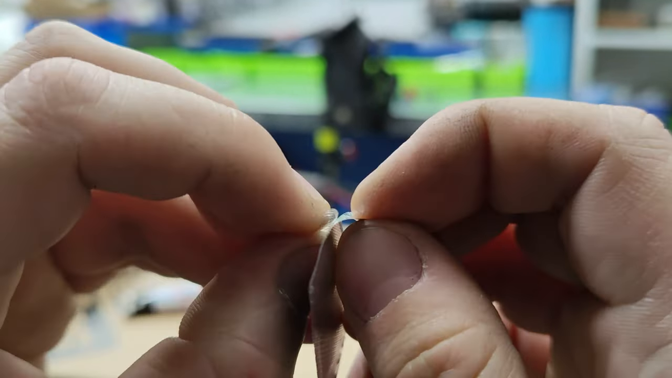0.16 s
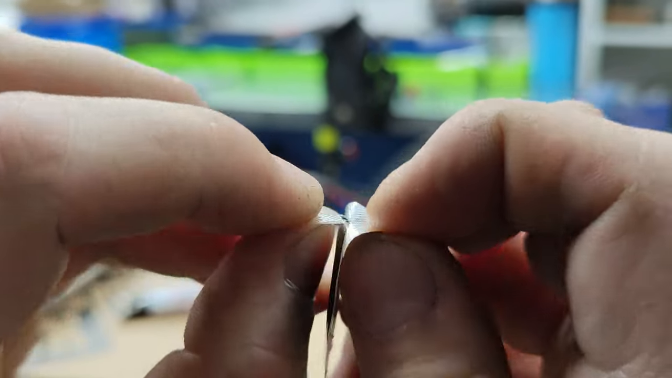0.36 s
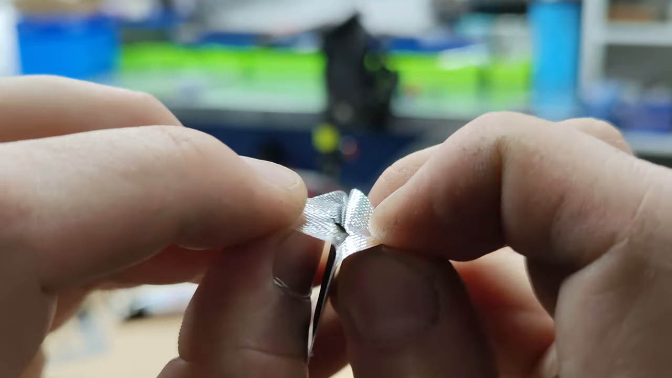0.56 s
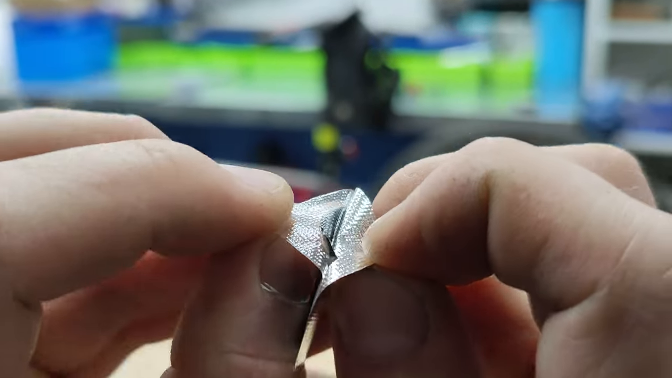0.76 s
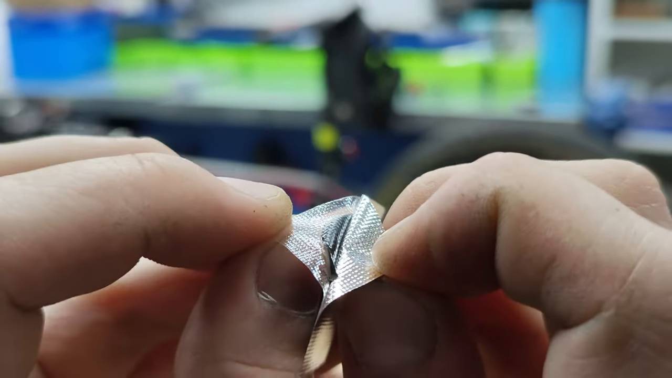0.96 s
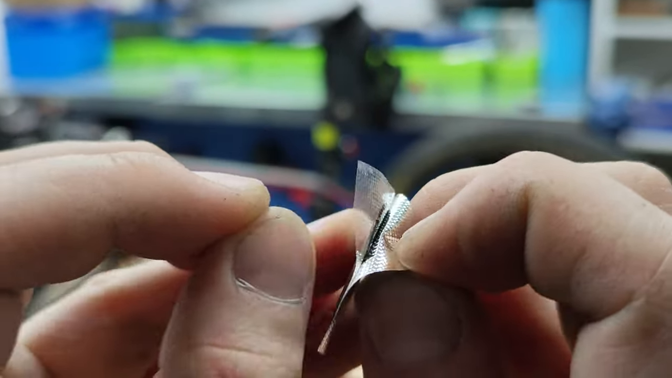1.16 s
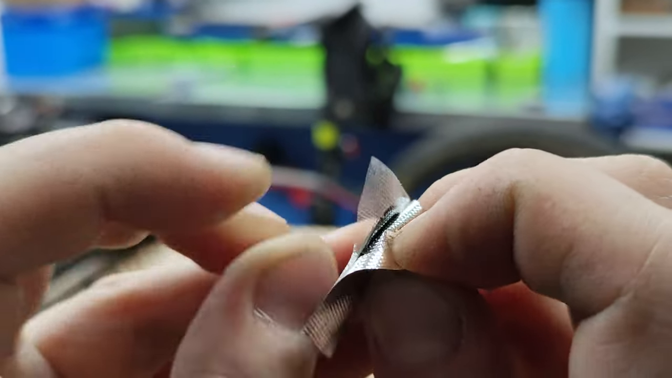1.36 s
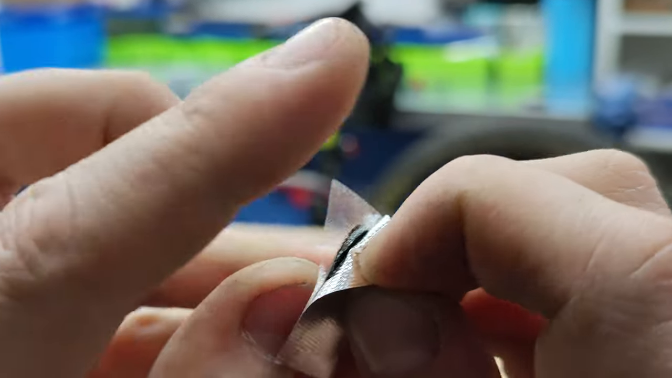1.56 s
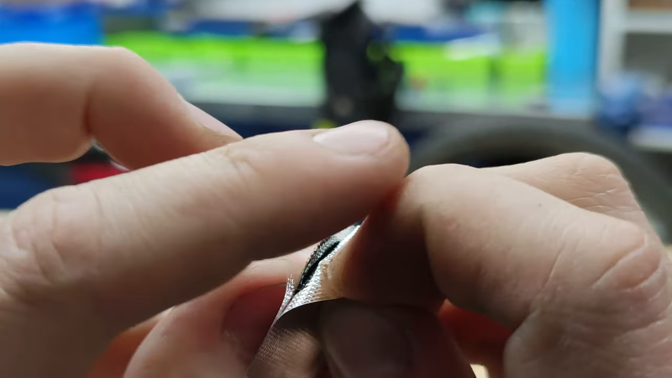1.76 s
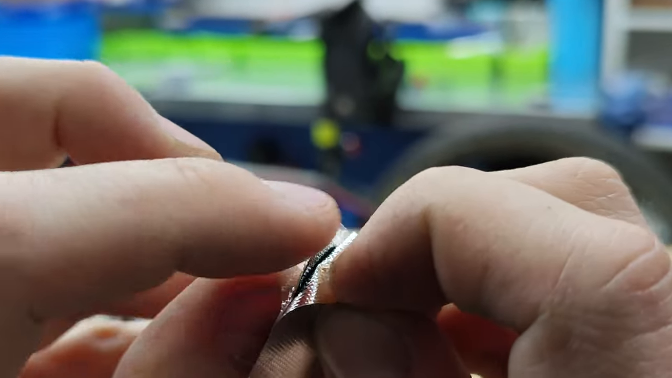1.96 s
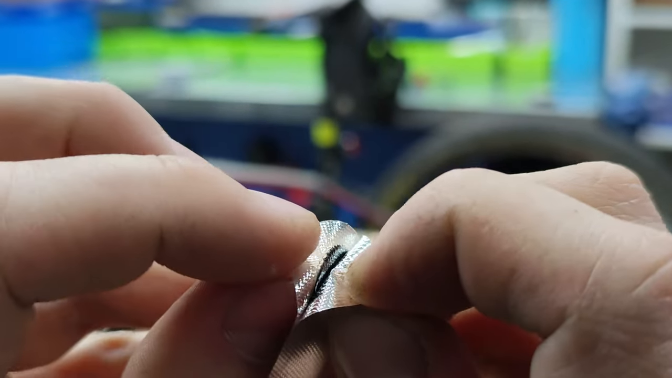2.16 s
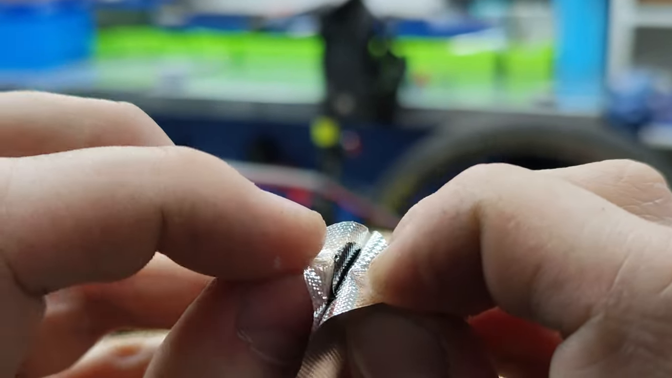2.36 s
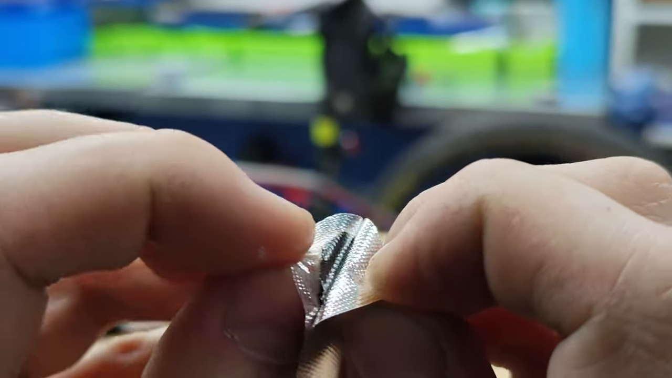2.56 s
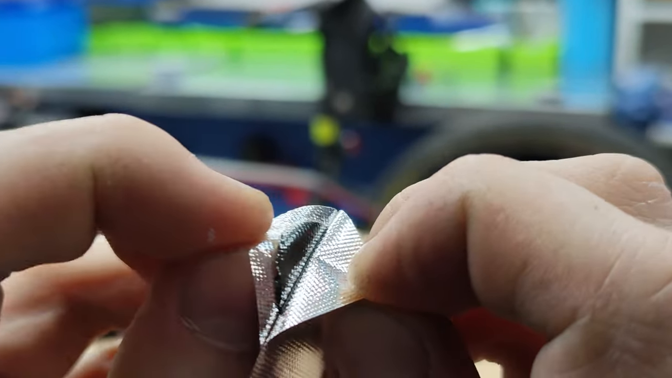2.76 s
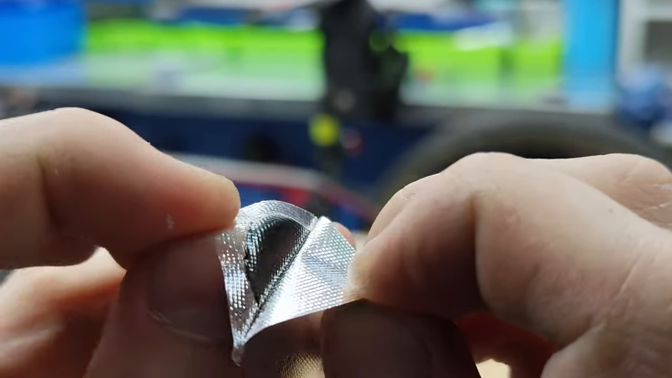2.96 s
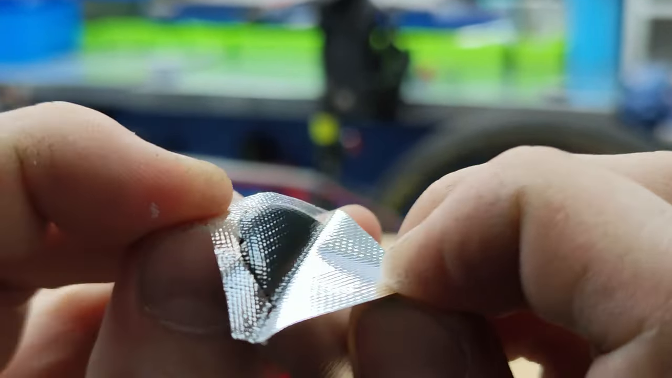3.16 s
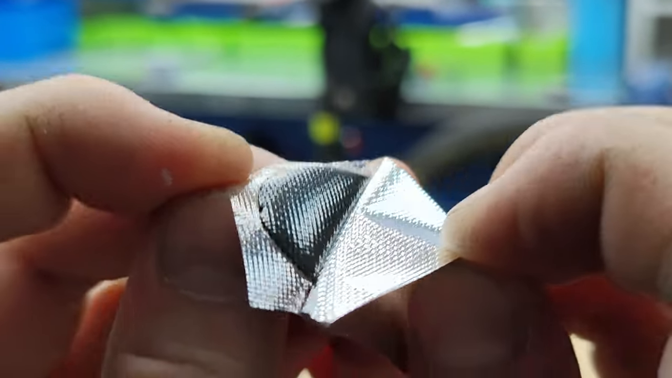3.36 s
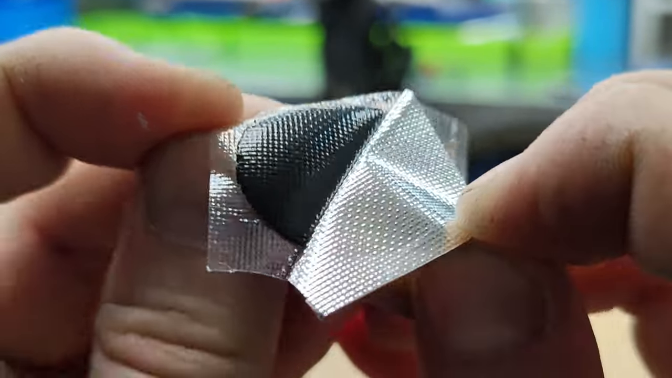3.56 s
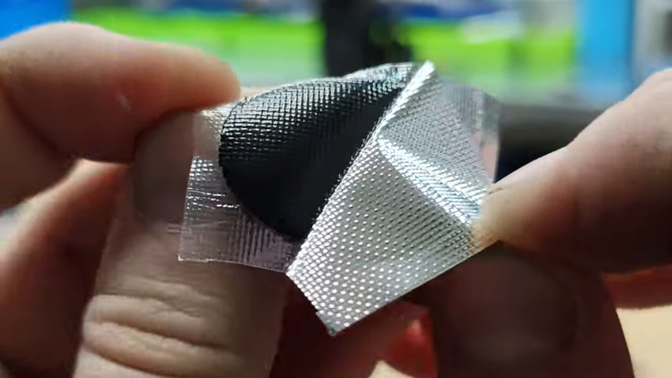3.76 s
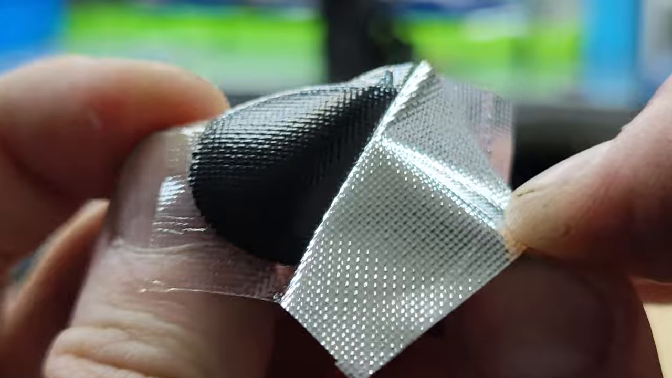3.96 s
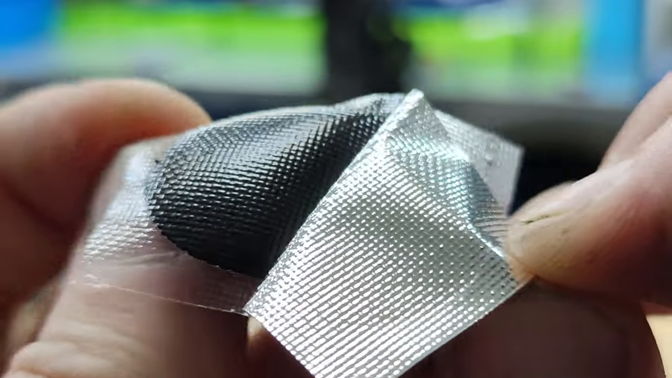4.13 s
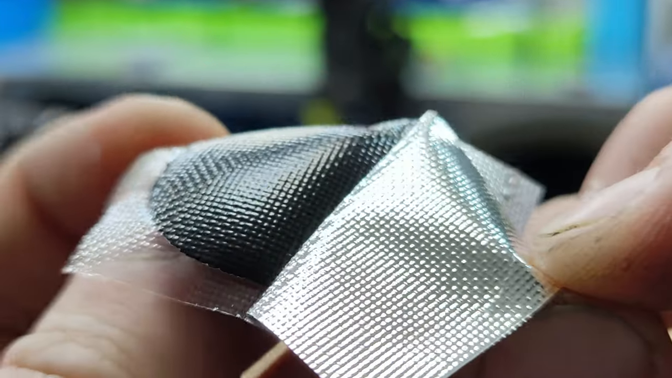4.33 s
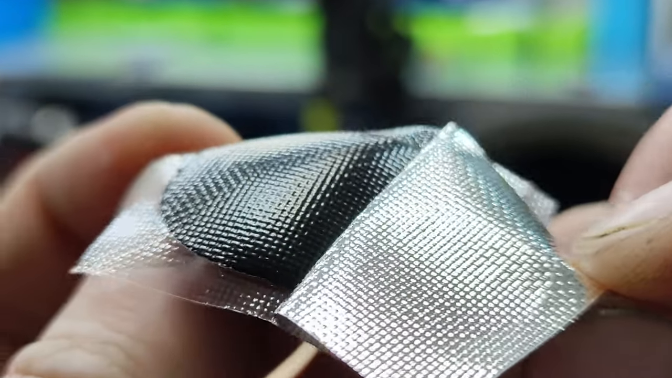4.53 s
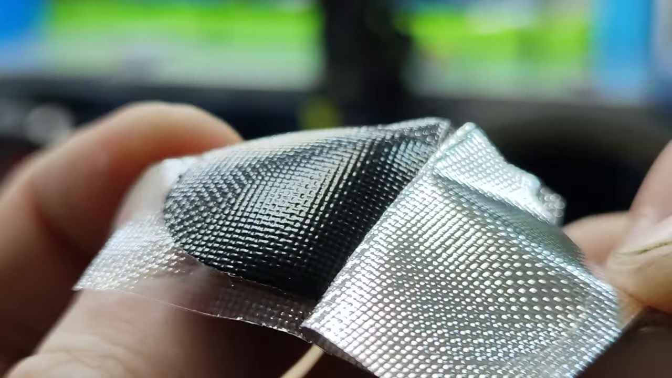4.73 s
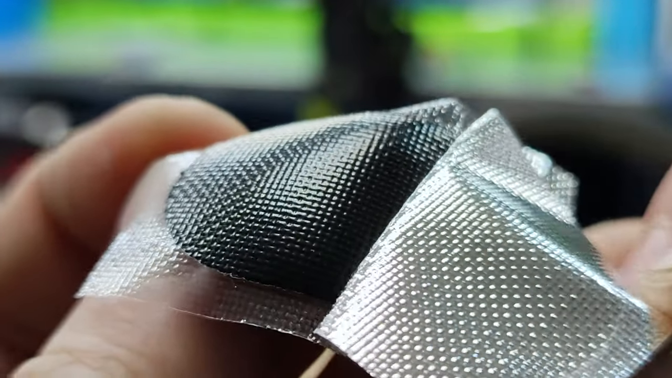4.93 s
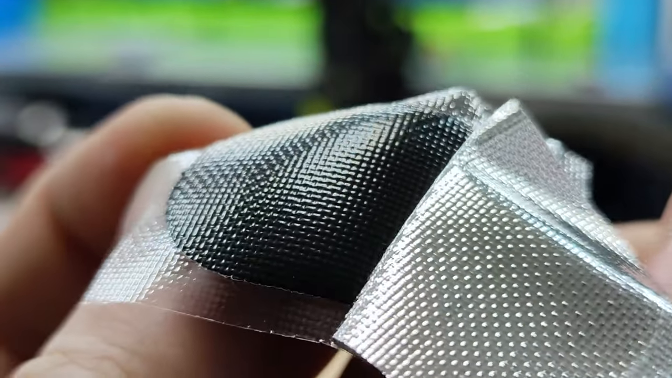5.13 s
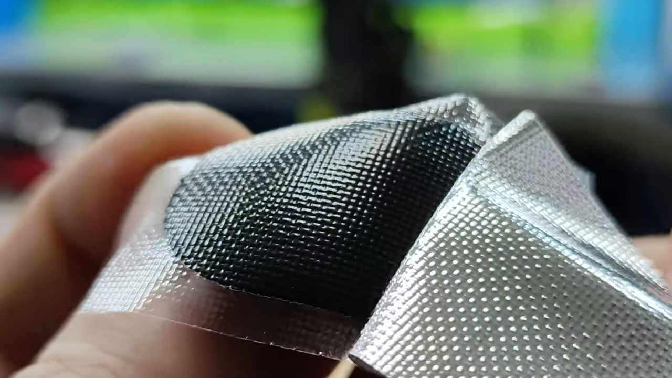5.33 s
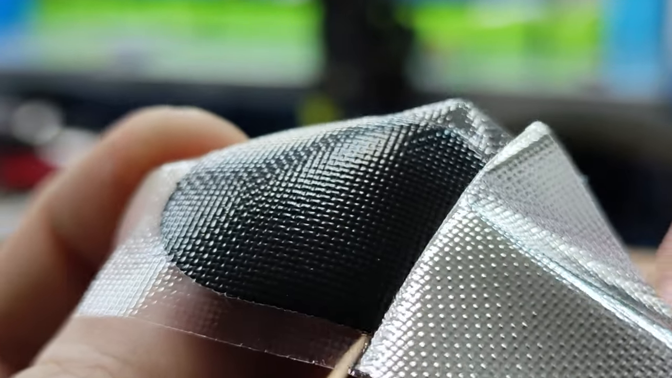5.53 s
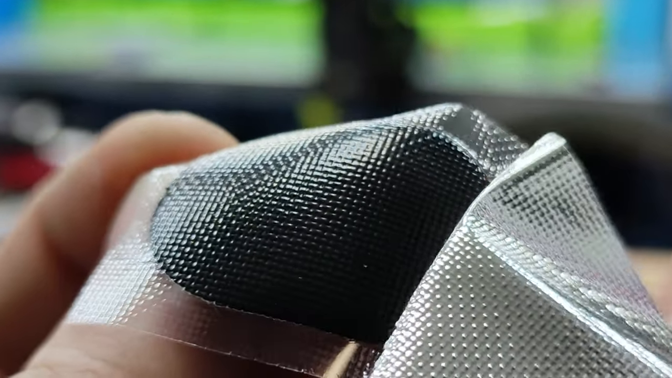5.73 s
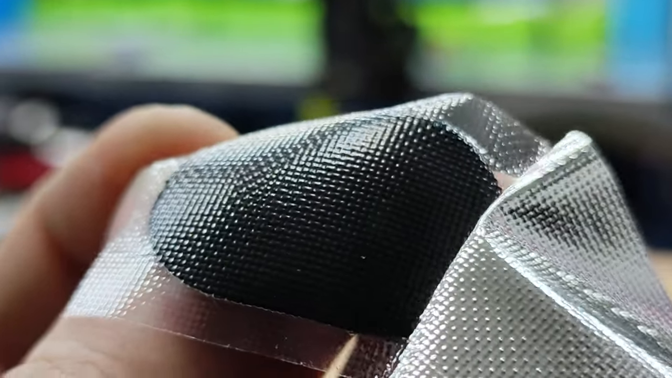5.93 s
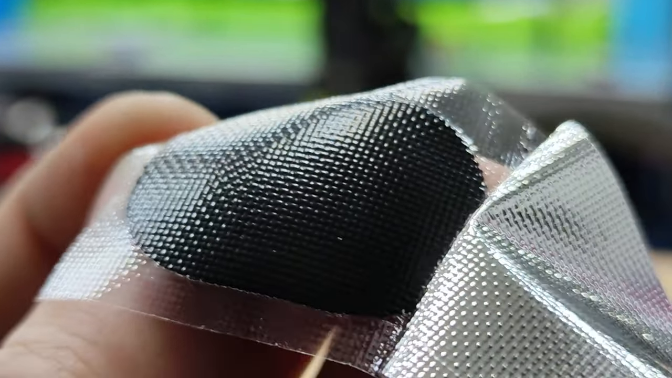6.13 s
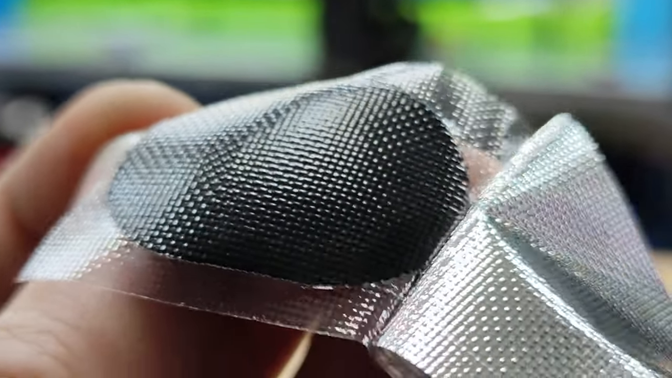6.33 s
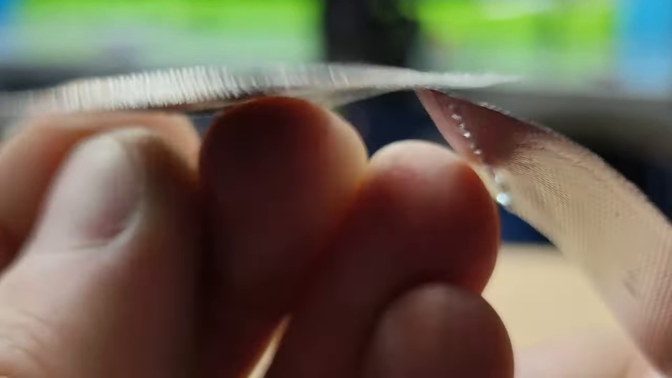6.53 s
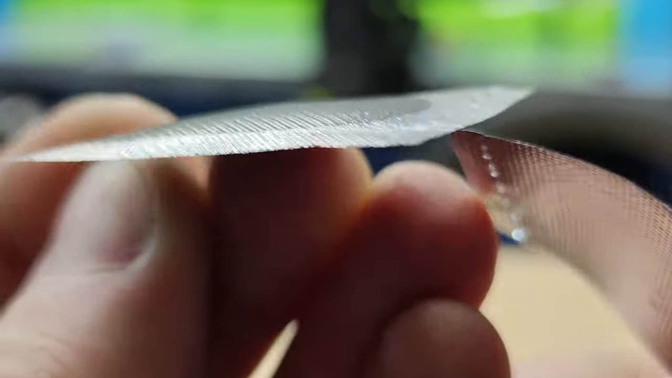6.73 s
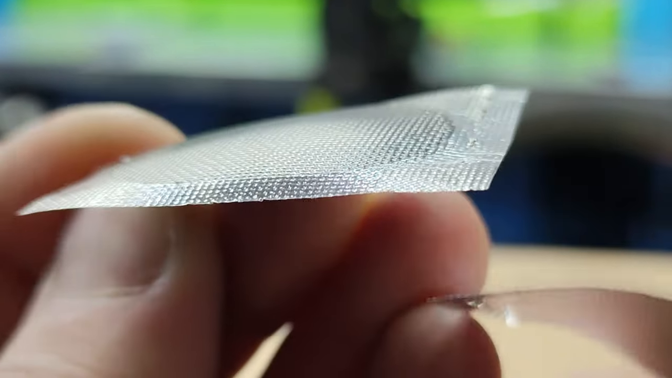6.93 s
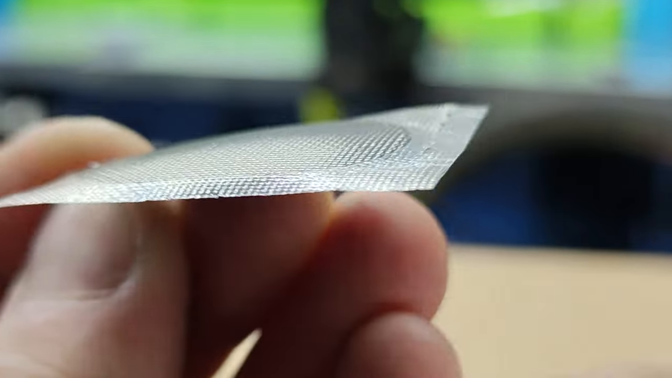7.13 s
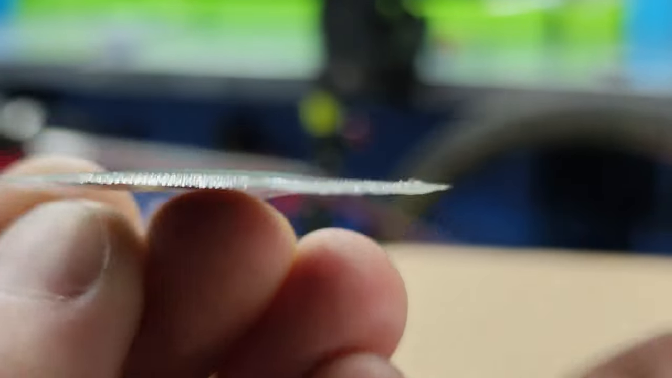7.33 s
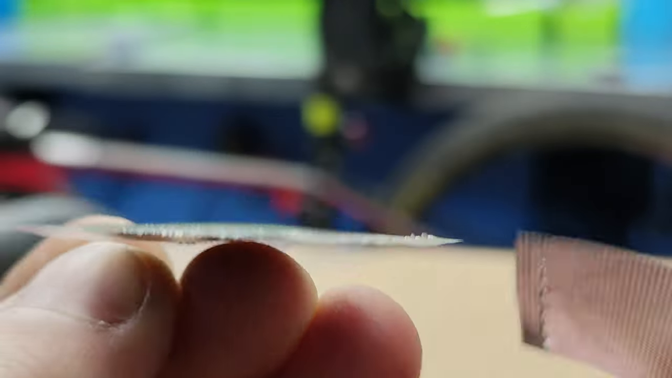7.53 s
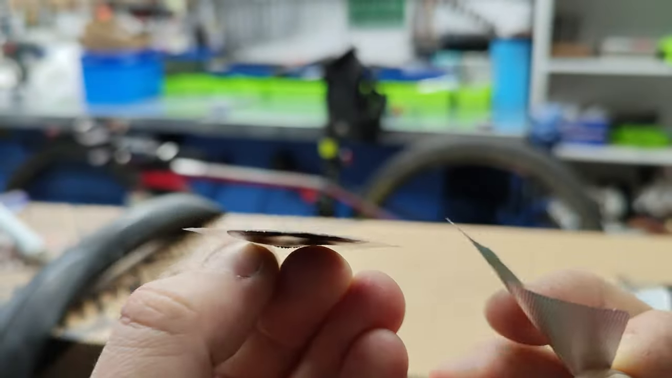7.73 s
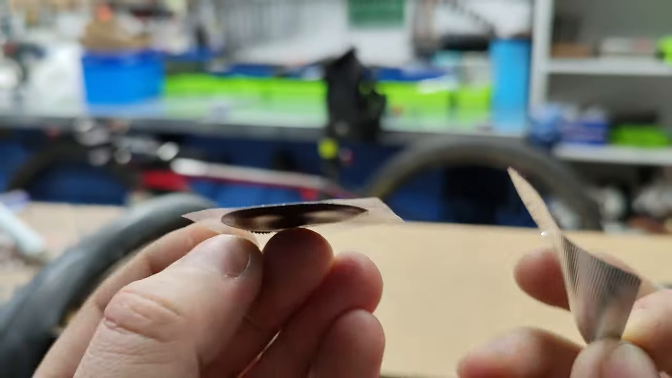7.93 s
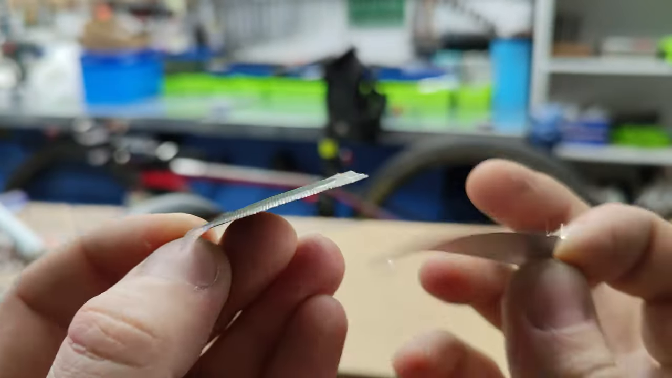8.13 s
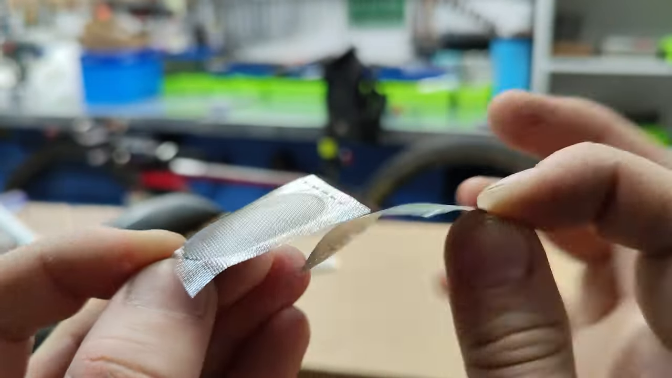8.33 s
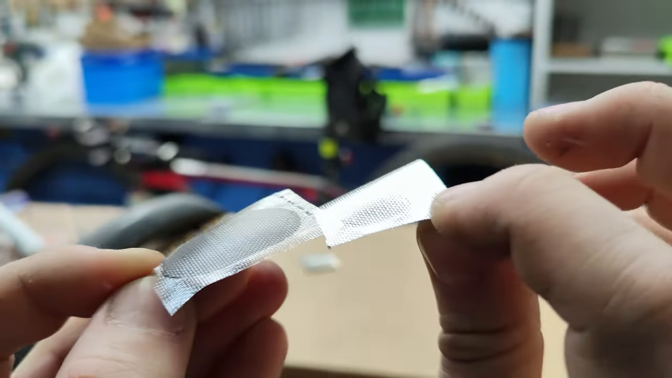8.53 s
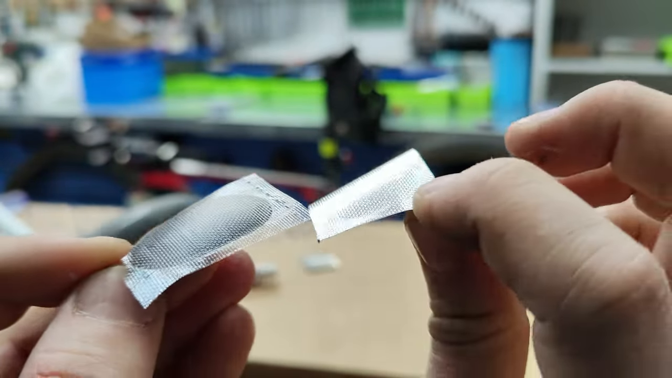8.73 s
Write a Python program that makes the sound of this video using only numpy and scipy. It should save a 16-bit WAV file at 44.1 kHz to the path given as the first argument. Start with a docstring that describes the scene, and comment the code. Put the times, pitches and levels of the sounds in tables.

```python
"""Foil peeled off a rubber patch

Fingers peel embossed foil backing off a rubber tyre patch, close to a phone in a quiet workshop.
Creases tick singly or in runs, the sheet buckles, glue crackles; the foil rips loose near 6.5 s.
Bursts of noise or slips ring broad sheet resonances; decaying sines make pitched tocks and a hand bump.
Crackle also shakes the lifted flap. A short noise tail is the small room, over rumble and hiss."""
import sys
import numpy as np
from scipy import signal
from scipy.fft import rfft, irfft
from scipy.io import wavfile

SR = 44100
rng = np.random.default_rng(int(sys.argv[2]) if len(sys.argv) > 2 else 0)


def wav_record(signal):
    """Record a signal, one row per channel, as 16-bit PCM in the file named by sys.argv[1]."""
    frames = np.transpose(np.atleast_2d(signal))
    bounded = np.clip(frames, -1, 1)
    # unit amplitude maps onto the largest positive 16-bit level
    quanta = np.round(bounded * 32767).astype(np.int16)
    wavfile.write(sys.argv[1], SR, quanta)


N = 392049
TIME = np.arange(N) / SR


def undb(db):
    """Decibels to gain."""
    return 10 ** (np.asarray(db) / 20)


def curve(rows, t):
    """Rows (time_s, value) joined by straight lines."""
    return np.interp(t, *np.transpose(rows))


def unit(x):
    """Scale to unit energy along the last axis."""
    return x / np.sqrt(np.sum(x ** 2, axis=-1, keepdims=True) + 1e-18)


def add(out, x, t):
    """Mix a stereo sound in at time t."""
    start = max(int(t * SR), 0)
    out[:, start:start + x.shape[1]] += x[:, :N - start]


def coloured(x, hz, db):
    """Shape a spectrum by (hz, db) points, joined over log frequency."""
    f = np.maximum(np.fft.rfftfreq(x.shape[-1], 1 / SR), 1)
    gain = undb(np.interp(np.log(f), np.log(hz), db))
    return irfft(rfft(x) * gain, x.shape[-1])


def ring(x, hz, width_hz, order=2):
    """A heavily damped resonance, as a bandpass."""
    low = np.hypot(hz, width_hz / 2) - width_hz / 2
    high = min(low + width_hz, SR / 2.1)
    return signal.sosfilt(signal.butter(order, [low, high], "band", fs=SR, output="sos"), x)


# right microphone port lies further off; the lag varies with the spot on the foil
PORT_LAG_S, LAG_SPREAD_S = 0.00021, 0.000035


def ports(near, stray, likeness):
    """The right port hears the same motion later, mixed with sound from other parts of the sheet."""
    share = np.clip(likeness, 0, 1)
    lag_s = PORT_LAG_S + LAG_SPREAD_S * rng.standard_normal(near.shape[:-1] + (1,))
    lag = np.rint(SR * lag_s).astype(int)
    size = near.shape[-1]
    late = np.take_along_axis(near, (np.arange(size) - lag) % size, axis=-1)
    return np.stack([near, share * late + np.sqrt(1 - share ** 2) * stray])


# where the hands hold the foil: time_s, left_minus_right_db
PLACE = [(0, 6.5), (3.4, 6.5), (6.2, 9), (6.46, 4), (7.1, 6), (7.55, 8), (8.15, 4)]


def placed(x, t):
    """Share the energy between left and right by where the hands are."""
    ratio = undb(curve(PLACE, t))
    sides = np.reshape([ratio, np.ones_like(ratio)], (2, -1))
    return x * sides / np.hypot(ratio, 1)


def play(times, sounds):
    """Lay out one stereo sound per event."""
    out = np.zeros((2, N))
    for t, sound in zip(times, sounds.swapaxes(0, 1)):
        add(out, placed(sound, t), t)
    return out


# sheet resonances, from whole-sheet flexing to the smallest dimples: centre_hz, width_hz
SHEET = [(290, 550), (1500, 1000), (4250, 2430), (8450, 2510), (12000, 1930)]


def sheet(push, modes_db, likeness):
    """A pair of unrelated pushes rings the uppermost resonances, one per column of modes_db."""
    sound = 0
    for (hz, width_hz), db in zip(SHEET[-modes_db.shape[1]:], modes_db.T):
        near, stray = unit(ring(push, hz, width_hz))
        sound = sound + undb(db)[:, None] * unit(ports(near, stray, likeness))
    return sound


def tilted(db, db_per_octave):
    """Energy in each resonance: the sharper the jolt, the more goes to the high ones."""
    hz = np.array(SHEET)[:, 0]
    return db[:, None] + db_per_octave[:, None] * np.log2(hz / np.median(hz))


def fractures(shape, per_s, spread_db):
    """Tiny slips at random moments: many weak, a few strong."""
    happens = rng.random(shape) < per_s / SR
    sizes = undb(spread_db * np.minimum(rng.exponential(size=shape), np.pi))
    return happens * sizes * rng.choice([-1, 1], shape)


# room rumble and, above 7 kHz, microphone hiss: freq_hz, relative_density_db (per Hz)
QUIET = [(25, -12), (45, -14.5), (80, -3.5), (130, -1.5), (330, -3.5), (600, -10.5), (1000, -13.5),
         (2000, -18.5), (4000, -23), (6800, -35.5), (10000, -25.5), (12500, -22), (14200, -23),
         (14700, -70)]
QUIET_RMS_DB = -60.5  # ahead of the phone's treble loss


def quiet():
    """Steady rumble and hiss, unrelated at the two ports."""
    noise = coloured(rng.standard_normal((2, N)), *np.transpose(QUIET))
    return undb(QUIET_RMS_DB) * np.sqrt(N) * unit(noise)


# room's answer: centre_hz, t60_s, relative_level_db
ROOM = [(300, 0.4, -15.5), (1510, 0.2, -12.5), (4080, 0.31, -15.5), (7800, .18, -17), (12830, 0.32, -19.5)]


def room(x, gap_s, size=16384):
    """Bench, shelves and walls scatter the sound; each band of the tail decays at its own rate."""
    t, f = TIME[:size], np.maximum(np.fft.rfftfreq(size, 1 / SR), 1)
    noise, tail = rfft(rng.standard_normal((2, size))), 0
    centres = np.log(np.array(ROOM)[:, 0])
    for (_, t60_s, db), band in zip(ROOM, np.eye(len(ROOM))):
        fade = unit(np.exp(-np.log(1000) * t / t60_s) * (t > gap_s))
        tail = tail + undb(db) * fade * irfft(noise * np.interp(np.log(f), centres, band))
    # the left port feeds both tails
    return signal.fftconvolve(x[:1], tail, axes=1)[:, :N]


BUMP_S, BUMP_HZ, BUMP_DB, BUMP_RISE_S, BUMP_FALL_S = 8.122, 124, -24, 0.006, 0.011


def bump(size=4096):
    """The hand knocks as it takes a new grip: a soft-edged, decaying low sine."""
    t = TIME[:size]
    fade = (1 - np.exp(-t / BUMP_RISE_S)) * np.exp(-t / BUMP_FALL_S)
    thud = undb(BUMP_DB) * unit(np.sin(2 * np.pi * BUMP_HZ * t) * fade)
    return play([BUMP_S], np.array([[thud], [thud]]))


# pitch of the lifted flap, sinking early and again near 3 s, climbing between: time_s, pitch_hz
FLAP = [(.2, 2230), (.45, 1610), (2.9, 2470), (3.15, 1840), (3.45, 1610)]


def flap(crackle, width_hz):
    """Crackle shakes the lifted flap: noise in a narrow band round its moving pitch."""
    shake = np.abs(crackle) * rng.standard_normal(N)
    turn = np.exp(2j * np.pi * np.cumsum(curve(FLAP, TIME)) / SR)
    lowpass = signal.butter(2, width_hz / 2, fs=SR, output="sos")
    # shift the pitch to 0 Hz, lowpass, shift back
    return 2 * np.real(turn * signal.sosfilt(lowpass, shake / turn + 1e-18))


# pulls on the foil, one list each: time_s, relative_crackle_db
PULLS = [
    [(0, -59.5), (.4, -50.5), (.7, -60.5)],
    [(1.9, -68), (2.6, -69.5)],
    [(2.8, -63), (2.95, -46.5), (3.08, -58), (3.4, -42.5), (3.52, -59.5), (3.7, -63.5)],
    [(6.36, -53), (6.6, -45)],
    [(6.9, -63.5), (7.02, -70), (7.15, -77)],
    [(7.87, -55.5), (7.98, -63), (8.35, -76)],
]


def peeling(per_s, spread_db, slip_s, modes_db, likeness):
    """Threads of glue part one by one; a harder pull breaks more of them, and harder."""
    pull = 0
    for rows in PULLS:
        time_s, level_db = np.transpose(rows)
        pull = pull + np.interp(TIME, time_s, undb(level_db), left=0, right=0)
    effort = np.sqrt(pull / pull.max())
    breaks = np.abs(fractures(N, per_s * effort, spread_db)) * effort * np.sqrt(effort)
    slips = signal.lfilter([1], [1, -np.exp(-1 / (slip_s * SR))], breaks + 1e-18)
    threads = ports(*(slips * rng.standard_normal((2, N))), likeness)
    fizz = 0
    for (hz, width_hz), db in zip(SHEET[2:], modes_db):
        fizz = fizz + undb(db) * unit(ring(threads, hz, width_hz))
    return placed(unit(fizz) * np.linalg.norm(pull), TIME)


# runs of grainy noise: foil ripping or rubbing, and rustling tails after the rip and a snap: # start_s,
# length_s, relative_energy_db (tilt pivot, 4 kHz), brightness_db_per_octave
GRAINY_RUNS = [(0.389, 0.0083, -17, 4.5), (0.452, 0.021, -19, 3.5), (6.456, 0.003, -3.5, 1),
               (6.46, 0.013, 6, 5), (6.474, 0.033, -5, 2.5), (6.505, 0.023, -8, 0.6),
               (6.997, 0.032, -26.5, -1.5), (7.144, 0.032, -31.5, -2.4), (7.642, 0.138, -26.5, -1),
               (8.102, 0.038, -24, -.5), (8.147, 0.019, -19.5, 0)]
# answer of each sheet resonance: gain_db
GRAINY_RUN_ANSWER_DB = [0, -1, 1, -1, 0]


def grainy_runs(slips, spread_db, rise_s, fall_s, sag_db, likeness, size=6144):
    """A run of slips, weakening as the tension goes: short runs fuse, long ones stay grainy."""
    rows, t = np.array(GRAINY_RUNS), TIME[:size]
    length_s = rows[:, 1:2]
    force = (1 - np.exp(-t / rise_s)) * undb(-sag_db * t / length_s)
    force = force * np.exp(-np.maximum(t - length_s, 0) / fall_s)
    push = fractures((2, len(rows), size), slips / length_s, spread_db) * force
    modes_db = tilted(*rows[:, 2:].T) + GRAINY_RUN_ANSWER_DB
    return play(rows[:, 0], sheet(push, modes_db, likeness))


# whole sheet buckling: time_s, relative_energy_db (tilt pivot, 4 kHz), brightness_db_per_octave,
# muffling_db (by the fingers; negative brightens), dome_pitch_hz, dome_relative_energy_db
SNAPS = [(1.1308, -10, 2, -5.5, 1185, -18.5), (2.964, -9, 3, -7, 2470, -40),
         (4.099, -19.5, 1.5, 7, 1290, -27), (4.106, -16.5, 4, 5.5, 4000, -35),
         (4.1238, -15, 4, 4, 4060, -31), (4.21, -5, 4.5, 1.5, 1735, -4),
         (4.2493, -16.5, 3, 17, 3870, -18.5), (5.059, -25, 2.5, 25, 4000, -25),
         (5.145, -19, 12, 27.5, 1793, -8.5), (5.8082, -15, 1.5, 24, 2010, -20),
         (5.9907, -18, 4.5, 4, 1234, -32), (7.6121, -7.5, 3, 17, 1500, -16.5),
         (7.633, -20, 3.5, 3, 776, -24)]
# modes of the taut dome: pitch_multiple, relative_energy_db
DOME = [(1, 1), (2.2, -3.5), (3.2, -5), (4.14, -9)]


def domes(rows, rise_s, cycles, size=2048):
    """Foil taut over the patch pops through with a pitched tock; fingers muffle its upper modes."""
    t = TIME[:size]
    muffled_db, hz, db = rows[:, -3:-2], rows[:, -2:-1], rows[:, -1:]
    # falls 60 dB in this many cycles of its pitch
    fade = (1 - np.exp(-t / rise_s)) * np.exp(-np.log(1000) * t * hz / cycles)
    tock = 0
    for multiple, mode_db in DOME:
        gain = undb(db + mode_db - muffled_db * np.log2(multiple) / 2)
        tock = tock + gain * unit(np.sin(2 * np.pi * multiple * hz * t) * fade)
    return play(rows[:, 0], ports(tock, stray=0, likeness=1))


# answer of each sheet resonance: gain_db
SNAP_ANSWER_DB = [0, 0, -1, 0, 0]


def flips():
    """The whole sheet flips; fingers resting on it muffle the two treble resonances."""
    t, db, brightness, muffled_db = np.transpose(SNAPS)[:4]
    hz = np.array(SHEET)[:, 0]
    muffling_db = np.outer(muffled_db, hz > np.median(hz))
    return np.column_stack([t, tilted(db, brightness) + SNAP_ANSWER_DB - muffling_db])


# bends, each flipping a handful of small creases:
# start_s, length_s, relative_treble_energy_db (per crease), 4khz_minus_treble_db
BENDS = [(0.005, 0.049, -16, -15), (0.153, 0.064, -14, -21), (.3, 0.04, -11.5, -22), (.428, .035, -16, -11),
         (0.513, 0.06, -22, -17), (0.622, 0.081, -22.5, -13), (0.934, 0.034, -25.5, -15),
         (1.944, 0.081, -38, -2), (2.949, .105, -5, -25), (3.064, 0.058, -16, -17),
         (3.143, 0.025, -16.5, -2.5), (3.205, 0.022, -13, -10), (3.255, 0.034, -20, -19),
         (3.34, 0.021, -13.5, -16), (3.39, 0.037, -8, -11.5), (3.43, 0.037, -12, -9.5),
         (3.491, .12, -19, -11), (3.679, .08, -24.5, -11), (6.556, .04, -25, -3.5),
         (6.975, 0.053, -19, -9.5), (7.356, 0.088, -26.5, -10), (7.942, 0.038, -17, -15),
         (8.06, 0.053, -22, -10), (8.279, .027, -27.5, -23)]


def crinkles(scatter_db, count=5):
    """As the foil bends, small creases give one after another at uneven moments and strengths."""
    start_s, length_s, db, body_db = np.array(BENDS).T[:, :, None]
    t = start_s + length_s * (np.arange(count) + rng.random((len(BENDS), count))) / count
    strength_db = db + scatter_db * rng.standard_normal(t.shape)
    return np.column_stack([t.ravel(), strength_db.ravel(), np.repeat(body_db, count)])


def creases(rows, lean, lean_db, scatter_db):
    """Split treble energy in two: wider creases lean to the lower resonance, and no two are alike."""
    t, db, body_db = np.transpose(rows)
    ratio = undb(lean * body_db + lean_db + scatter_db * rng.standard_normal(len(t)))
    top_db = db - 10 * np.log10(1 + ratio ** 2)
    return np.column_stack([t, db + body_db, top_db + 20 * np.log10(ratio), top_db])


LEAD_S = 0.002  # foil starts to give this long before it flips


def buckles(rows, give_s, jolt_s, shiver_s, shiver_db, likeness, size=1024):
    """Foil gives, flips in one jolt, then shivers for a few milliseconds."""
    t = TIME[:size] - LEAD_S
    before, after = np.minimum(t, 0), np.maximum(t, 0)
    shiver = undb(shiver_db) * np.exp(-after / shiver_s)
    force = np.exp(before / give_s) * (np.exp(-after / jolt_s) + shiver)
    push = rng.standard_normal((len(rows), 2, size)).swapaxes(0, 1) * force
    return play(rows[:, 0] - LEAD_S, sheet(push, rows[:, 1:], likeness))


# single creases flipping: time_s, relative_treble_energy_db (top two resonances), 4khz_minus_treble_db
TICKS = [(0.0213, -10, -28), (0.0397, -7, -28), (0.1575, -16.5, -15), (0.2246, -12, -10.5),
         (0.2875, -5.5, -29), (0.3215, -5.5, -19), (0.3489, -9.5, -31), (0.4379, -8, -9), (0.4445, -3, -18),
         (0.5476, -6.5, -19.5), (0.5766, -9.5, -26), (0.6389, -8, -17), (0.7949, -8, -21.5),
         (0.8741, -17, -12), (0.9633, -14.5, -8), (1.2675, -18.5, -19), (2.1744, -32.5, 0),
         (2.3752, -14.5, -17.5), (2.3921, -12, -24.5), (2.4758, -8.5, -54), (2.5734, -20.5, -14),
         (2.8384, -1.5, -18), (2.8698, -3.5, -21), (2.9053, 0, -15.5), (2.9344, 3, -20), (2.9888, 3, -17.5),
         (3.0226, -5, -12), (3.0284, -4.5, -13.5), (3.1242, -4, -15.5), (3.1958, -5, -8),
         (3.2704, -1.5, -10), (3.302, 0.5, -22), (3.3058, 0, -17), (3.3373, 1, -14.5), (3.3574, 0, -16),
         (3.3703, -7, -20), (3.388, -3, -5.5), (3.4688, 1, -17.5), (3.7469, -6, -13.5), (3.8088, -8.5, -24),
         (3.8959, -19.5, -12), (3.9466, -16.5, -13.5), (4.1606, -12, -20), (4.4209, -22.5, -9.5),
         (4.4847, -17.5, -14), (4.5735, -17.5, -22), (4.7076, -13.5, -7), (4.8702, -22.5, -21),
         (5.0528, -26.5, -6), (5.1274, -21.5, -17), (5.6794, -15, -9.5), (5.9861, -12.5, -13),
         (6.0537, -12, -15.5), (6.2156, -8.5, -12.5), (6.445, 4, -17), (6.5462, -4.5, -12.5),
         (6.6374, -12, -29), (6.6706, -22.5, -14), (6.8178, -12, -14.5), (6.879, -17, -10),
         (6.9023, -15, -18), (6.95, -11.5, -11.5), (6.9853, -11.5, -17), (7.047, -9.5, -22),
         (7.0611, -4.5, -11), (7.0861, -8, -18.5), (7.14, -10, -5), (7.2382, -13, -20),
         (7.3527, -16, -14.5), (7.5137, -14, -10), (7.5298, -23, -8), (7.5441, -7, -9), (7.9155, -2, -13),
         (7.9557, -7.5, -5.5), (8.0318, -10, -22), (8.0774, -10.5, 1.5), (8.0961, -3.5, -10.5),
         (8.1628, -17, -7), (8.323, -15.5, -18), (8.394, -20, -12), (8.8434, -27.5, -18)]


def scene():
    """Ticks, crinkling, snaps, grainy runs, peeling and a bump of the hand in the room."""
    sharp = creases(TICKS, lean=0.41, lean_db=-0.5, scatter_db=5)
    small = creases(crinkles(scatter_db=1.5), lean=0.25, lean_db=1.0, scatter_db=5)
    ticks = undb(1.5) * buckles(
        sharp, give_s=0.00027, jolt_s=0.00025, shiver_s=0.0029, shiver_db=-13, likeness=0.99)
    crinkle = undb(2.5) * buckles(
        small, give_s=0.00046, jolt_s=0.000264, shiver_s=0.0027, shiver_db=-7.5, likeness=1.0)
    snaps = undb(1.5) * buckles(
        flips(), give_s=0.0014, jolt_s=0.00026, shiver_s=0.0026, shiver_db=-3.5, likeness=1.0)
    tocks = undb(1.5) * domes(np.array(SNAPS), rise_s=0.00038, cycles=21)
    rips = undb(1.5) * grainy_runs(
        slips=70, spread_db=1.5, rise_s=0.001, fall_s=0.0017, sag_db=8.0, likeness=0.14)
    glue = undb(2.5) * peeling(
        per_s=1100, spread_db=14.5, slip_s=0.0019, modes_db=[-9, -1, 0], likeness=0.5)
    crackle = ticks + crinkle + glue
    flapping = undb(-15) * flap(crackle, width_hz=600)
    foil = crackle + flapping + snaps + tocks + rips + bump()
    return foil + undb(-1.0) * room(foil, gap_s=0.0023) + quiet()


TOP_HZ = 16700


def record(dry):
    """The phone's treble falls away quickly above 14 kHz and stops at TOP_HZ."""
    soft = coloured(dry, [14300, 16500], [0, -14])
    return signal.sosfilt(signal.ellip(8, 0.2, 70, TOP_HZ, fs=SR, output="sos"), soft)


dry = scene()
out = record(dry)
wav_record(out)
```